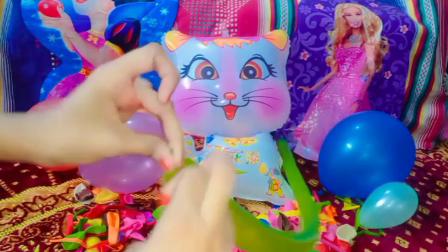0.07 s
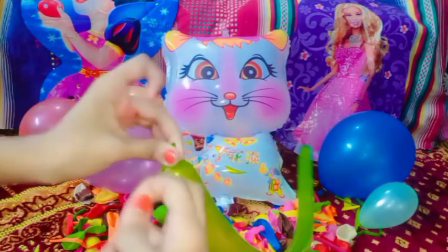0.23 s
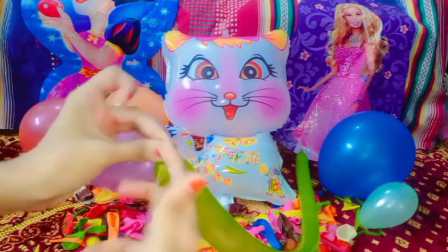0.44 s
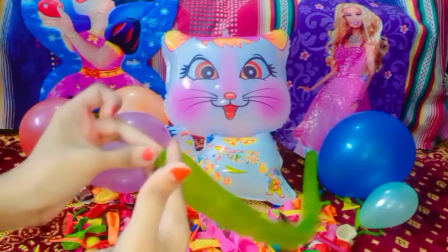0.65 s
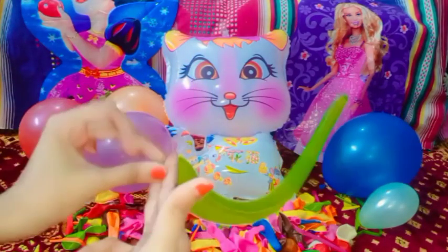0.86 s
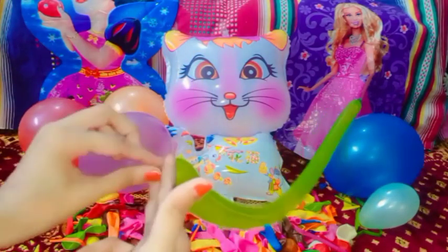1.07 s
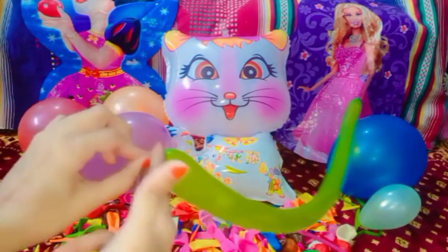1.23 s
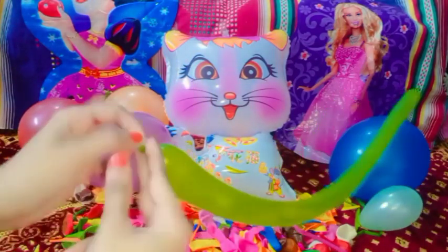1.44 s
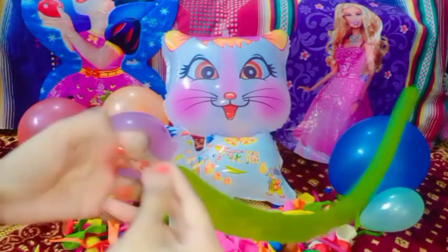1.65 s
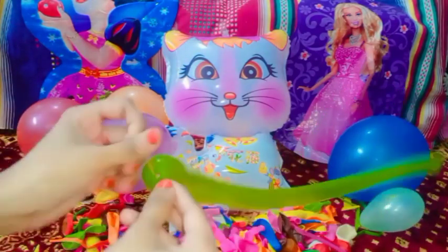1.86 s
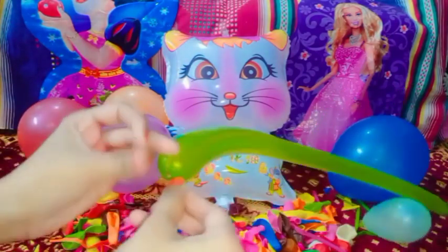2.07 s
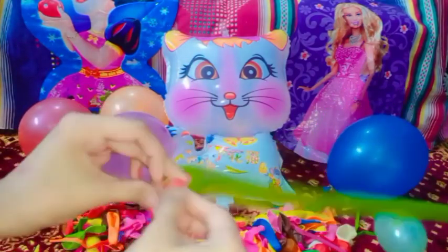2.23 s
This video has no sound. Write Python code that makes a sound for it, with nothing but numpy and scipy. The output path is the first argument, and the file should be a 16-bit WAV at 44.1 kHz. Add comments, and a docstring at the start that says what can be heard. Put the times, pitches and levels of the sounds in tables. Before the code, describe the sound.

Balloon rubber snaps sharply off fingertips, with small ticks and a creak as it is knotted.

```python
"""The rubber neck of a long balloon snaps off the fingertips as it is stretched and knotted.
Each snap is a sharp crack that sets the air inside ringing faintly; the recoiling tube thumps.
The rubber slips over the fingers in small ticks, sings thin notes and creaks as the knot tightens.
Fingers rub the balloon's skin between snaps. It is all close by, over the low hum of a quiet room."""
import sys
import numpy as np
from scipy import signal
from scipy.fft import rfft, irfft, next_fast_len
from scipy.io import wavfile
from scipy.ndimage import map_coordinates

SR = 44100
rng = np.random.default_rng(int(sys.argv[2]) if len(sys.argv) > 2 else 0)


def unload_wav(signal):
    """Save mono or channel-first audio to the path in sys.argv[1] as 16-bit WAV at rate SR, clipped to [-1, 1]."""
    wavfile.write(
        sys.argv[1],
        SR,
        np.round(np.clip(np.atleast_2d(signal).T, -1, 1) * 32767).astype(np.int16),
    )


N = 101429

# A "colour" says how strong low and high sounds are. "fade" is the time to die away by 60 dB.
BACKGROUND_COLOUR = [(15, -27), (25, -2), (75, -7), (108, -7.5), (214, -2.5), (244, -9.5), (278, -8),
                     (411, -11.5), (481, -15.5), (520, -13.5), (578, -15), (694, -11), (1030, -22),
                     (1230, -17.5), (1650, -22.5), (2080, -26.5), (13000, -74.5)]  # the room's steady noise: f/Hz, level/dB
HUM_BANDS = [(113, 29, -50), (241.7, 16, -54.5), (676.4, 56, -58.5)]  # the room's hum: f/Hz, width/Hz, level/dB
RUB_LEVELS = [(0, -70.5), (.17, -71.5), (.26, -52), (.47, -59.5), (.55, -70.5), (.73, -67), (.78, -58),
              (.84, -66), (.96, -61), (1.04, -68.5), (1.11, -60), (1.2, -67), (1.36, -71), (1.44, -66.5),
              (1.58, -69), (1.7, -66.5), (1.79, -64.5), (1.85, -51.5), (1.93, -63), (2, -68.5), (2.06, -55),
              (2.12, -60.5), (2.2, -69.5), (2.3, -61)]  # fingers rubbing: t/s, level/dB
RUB_TONE = [(300, -17.5), (1500, 6.5), (5000, 6.5), (7500, -3.5), (10500, -6.5), (12800, -4.5)]  # colour of the rubbing: f/Hz, level/dB
RUMBLE_LEVELS = [(0, -56), (.22, -46.5), (.3, -43.5), (.46, -42.5), (.53, -63), (1.02, -69), (1.09, -48),
                 (1.2, -53), (1.78, -76), (1.85, -38), (1.98, -47), (2.12, -43.5), (2.3, -49)]  # rumble of handling the balloon: t/s, level/dB
RUMBLE_COLOUR = [(25, -24), (55, -11.5), (115, 5), (230, -7.5), (500, -9.5), (1500, -40), (5000, -101)]  # colour of that rumble: f/Hz, level/dB
RUBBER_COLOUR = [(900, 2), (1130, 3), (1750, 0.5), (4000, -2), (5700, 0.5), (6800, 3.5), (8600, -2.5),
                 (10200, 0)]  # colour of the tight rubber: f/Hz, level/dB
FINGER_SLIPS = [(0.196, -25, 4370, -19), (0.2052, -22, 4360, -19), (0.216, -25, 4070, -37),
                (0.2377, -4, 6540, 13), (.381, -19, 2700, -31), (0.401, -18, 3000, -25),
                (0.449, -16.5, 3500, -38), (0.458, -14.5, 3180, -36), (0.465, -16, 2100, -20),
                (0.763, -21, 1450, -15), (1.536, -38, 4410, -17), (1.621, -34, 3500, -8),
                (1.739, -30, 2940, -16), (1.803, -15.5, 1900, -24), (1.833, -12.5, 1840, -22),
                (1.845, -16, 2300, -14), (1.895, -13.5, 1740, -35), (1.9068, -14.5, 1880, -23),
                (1.9245, -16.5, 1960, -32), (1.956, -19, 2260, -27), (2.104, -22, 1210, -26)]  # small slips of the rubber: t/s, level/dB, f/Hz, treble/dB
# Snaps of the neck: t/s, relative level/dB, f/Hz, width/octaves, bass/dB, treble/dB, fade/s
NECK_SNAPS = [(0.2412, 3.5, 2260, 1, 5, -5.5, 0.011), (0.3647, -12, 3250, 0.95, -2.5, -21, 0.018),
              (1.0825, -21, 2950, 1, -26, -2, 0.0067), (1.8203, -11, 1820, 0.32, -2, -22.5, 0.028),
              (2.0258, -11.5, 1340, 0.78, 11.5, -24, 0.026)]
AIR_NOTES = [(312, -60, .45), (368, -38.5, 0.34), (468.6, -32, 0.18), (913, -42, 0.26), (999, -47.5, 0.71),
             (1760, -47, 0.27), (2800, -53, 0.197)]  # ringing of the air inside: f/Hz, level/dB relative to the snap, fade/s
TUBE_THUMPS = [(.247, -27, 319.7, 0.22), (.251, -20.5, 224.6, 0.14), (1.823, -16.5, 387.3, 0.047),
               (1.828, -19, 227.6, 0.16), (2.02, -18, 601, 0.066), (2.026, -31, 388.5, 0.19),
               (2.04, -35.5, 650, 0.21)]  # low notes of the recoiling tube: t/s, level/dB, f/Hz, fade/s
THIN_NOTES = [(.306, -28.5, 1298, 0.021, 0.12), (.381, -38.5, 1293, .017, 0.24),
              (1.917, -47, 3350, .01, 0.081), (2.17, -68.5, 3385, 0.1, 1.5)]  # notes of the stretched neck: peak t/s, level/dB, f/Hz, rise/s, fade/s
CREAK_LEVELS = [(1.72, -71), (1.8, -51), (1.835, -44.5), (1.878, -51), (1.91, -45), (1.99, -65),
                (2.04, -90)]  # the knot tightening: t/s, level/dB
CREAK_TONE = [(200, -27), (1100, 0.5), (2000, -1.5), (6000, -12), (13000, -39)]  # colour of the creak: f/Hz, level/dB
ECHO_FADES = [(150, 0.37), (600, 0.47), (2000, 0.47), (5000, 0.37), (12000, 0.27)]  # how long the room echoes: f/Hz, fade/s
ECHO_COLOUR = [(100, -15), (300, -14), (700, -4.5), (1800, -2.5), (5000, -7), (12000, -2.5)]  # colour of the room's echo: f/Hz, level/dB

BASS_EDGE_HZ = 604  # the bass of slips and snaps falls off above this


def amp(db):
    """Turn decibels into a number to multiply by."""
    return 10 ** (np.asarray(db) / 20)


def unit(x):
    """Scale a sound to an average strength (rms) of 1."""
    return x / np.sqrt(np.mean(x ** 2) + 1e-20)


def along(points, hz):
    """Read between the (f/Hz, value) rows of a table, on a pitch scale."""
    f, v = np.transpose(points)
    return np.interp(np.log(hz + 1), np.log(f + 1), v)


def loudness(rows):
    """Join (t/s, level/dB) rows into one gain per sample."""
    return amp(np.interp(np.arange(N) / SR, *np.transpose(rows)))


def filtered(x, response):
    """Turn each frequency of x up or down by response(hz)."""
    n = x.shape[-1]
    m = next_fast_len(n + SR // 4)
    return irfft(rfft(x, m) * response(np.fft.rfftfreq(m, 1 / SR)), m)[..., :n]


def noise(colour):
    """Noise of strength 1 with the given colour."""
    return unit(filtered(rng.standard_normal(N), lambda hz: amp(along(colour, hz))))


def wobble(per_s):
    """A smooth curve through per_s random values a second."""
    return map_coordinates(rng.standard_normal(int(N * per_s / SR) + 2), [np.arange(N) * per_s / SR])


def pulse(gain):
    """The most sudden click (minimum phase) that has this gain at each frequency."""
    cepstrum = irfft(np.log(gain + 1e-6))
    half = len(cepstrum) // 2
    cepstrum[1:half] *= 2
    cepstrum[half + 1:] = 0
    return irfft(np.exp(rfft(cepstrum)))


def room_tone():
    """The room's steady dull noise, with a few narrow bands that hum."""
    out = amp(-47) * noise(BACKGROUND_COLOUR)
    for centre_hz, width, db in HUM_BANDS:
        hum = filtered(rng.standard_normal(N), lambda hz: 1 / (1 + (2 * (hz - centre_hz) / width) ** 2))
        out += amp(db) * unit(hum)
    return out


def fingers():
    """Fingers rub the balloon with a grainy hiss, and handling it makes a dull rumble."""
    grain = amp(2 * wobble(per_s=250))
    rub = unit(noise(RUB_TONE) * grain)
    return rub * loudness(RUB_LEVELS) + noise(RUMBLE_COLOUR) * loudness(RUMBLE_LEVELS)


def rubber_band(hz, centre_hz, width_oct, treble_db, peak_top_hz=5140):
    """Gain at each frequency for a patch of rubber let go: one broad peak plus some treble."""
    peak = np.exp(-.5 * (np.log2(hz / centre_hz) / width_oct) ** 2)
    peak /= np.sqrt(1 + (hz / peak_top_hz) ** 20)
    treble = amp(treble_db) * hz ** 2 / (hz ** 2 + centre_hz ** 2) / np.sqrt(1 + (hz / 11000) ** 2)
    return (peak + treble) * amp(along(RUBBER_COLOUR, hz))


def slips(size=2048, rise_s=.0025, fade_s=.016):
    """The rubber creeps over the fingers in short, soft-edged scrapes."""
    out, hz, t = np.zeros(N), np.fft.rfftfreq(size, 1 / SR) + 1, np.arange(size) / SR
    bass = amp(-5) / (1 + (hz / BASS_EDGE_HZ) ** 2)
    for s, db, centre_hz, treble_db in FINGER_SLIPS:
        friction = rng.standard_normal(size) * amp(-60 * t / fade_s) * (1 - np.exp(-t / rise_s)) ** 2
        band = rubber_band(hz, centre_hz, width_oct=1, treble_db=treble_db)
        scrape = signal.fftconvolve(friction, pulse(band + bass))[:size]
        add(out, s, amp(db) * in_room(scrape / np.linalg.norm(scrape)))
    return out


def add(track, s, sound):
    """Mix a sound into the track, starting at s seconds."""
    part = track[round(s * SR):][:len(sound)]
    part += sound[:len(part)]


def in_room(sound, wall_s=.0148, early_s=.022):
    """The room answers a sound: scatter from nearby, an echo off the first wall, then a fading tail."""
    hz, t, spectrum = signal.stft(rng.standard_normal(SR * 2 // 3), SR, nperseg=256)
    fading = amp(-60 * t / along(ECHO_FADES, hz)[:, None])
    tail = signal.istft(spectrum * fading, SR, nperseg=256)[1]
    since_wall = np.arange(len(tail)) / SR - wall_s
    early_echoes = amp(.5) * np.exp(-np.abs(since_wall) / early_s)
    tail *= np.where(since_wall < 0, amp(.5), 1 + early_echoes)
    answer = amp(-3.5) * filtered(tail / np.linalg.norm(tail), lambda f: amp(along(ECHO_COLOUR, f)))
    answer[0] += 1  # the direct sound
    answer[round(wall_s * SR)] += amp(-20)  # the first wall
    return signal.fftconvolve(sound, answer)


def crack(centre_hz, width_oct, bass_db, treble_db, fade_s, size=2048):
    """Rubber let go: one sharp click with a low push, then a brief, duller flutter of the skin."""
    hz, t = np.fft.rfftfreq(size, 1 / SR) + 1, np.arange(size) / SR
    band = rubber_band(hz, centre_hz, width_oct, treble_db)
    bass = amp(bass_db) / (1 + (hz / BASS_EDGE_HZ) ** 2) * hz ** 2 / (hz ** 2 + 170 ** 2)
    click = pulse(band + 2 * bass)
    flapping = rng.standard_normal(size) * amp(-60 * t / fade_s) * (1 - np.exp(-t / .00095))
    flapping *= amp(5) / np.linalg.norm(flapping)
    flutter = signal.fftconvolve(flapping, pulse(band / np.hypot(1, hz / 8000)))[:size]
    out = flutter - click
    return out / np.linalg.norm(out)


def air_ring(rise_s=.0012, spread_db=2.04):
    """The air in the balloon rings with several fading notes, in a slightly new mix each time."""
    air, t = 0, np.arange(SR * 2 // 3) / SR
    for hz, db, fade_s in AIR_NOTES:
        strength = amp(db + rng.normal(0, spread_db) - 60 * t / fade_s)
        air += strength * np.sin(2 * np.pi * (hz * t + rng.random()))
    return air * (1 - np.exp(-t / rise_s))


def snaps(crack_boost_db=7):
    """The neck snaps off a fingertip: it cracks and sets the air inside ringing."""
    out = np.zeros(N)
    for s, db, centre_hz, width_oct, bass_db, treble_db, fade_s in NECK_SNAPS:
        snap = crack(centre_hz, width_oct, bass_db, treble_db, fade_s)
        add(out, s, amp(db + crack_boost_db) * in_room(snap))
        add(out, s, amp(db) * air_ring())
    return out


def thumps(rise_s=.012):
    """Soft low notes swell and die as the tube springs back."""
    out, t = np.zeros(N), np.arange(SR // 2) / SR
    swell = 1 - np.exp(-(t / rise_s) ** 2)
    for s, db, hz, fade_s in TUBE_THUMPS:
        add(out, s, swell * amp(db - 60 * t / fade_s) * np.sin(2 * np.pi * hz * t))
    return out


def neck_notes(rough_db=2, waver_rad=.3, wobbles_per_s=130):
    """The tight neck sings briefly: each note swells and dies, rough in level and pitch."""
    out = np.zeros(N)
    for s, db, hz, rise_s, fade_s in THIN_NOTES:
        t = np.arange(N) / SR - s
        envelope = np.exp(np.minimum(t, 0) / rise_s) * amp(db - 60 * np.maximum(t, 0) / fade_s)
        roughness = amp(rough_db * wobble(wobbles_per_s))
        waver = waver_rad * wobble(wobbles_per_s)
        out += envelope * roughness * np.sin(2 * np.pi * hz * t + waver)
    return out


def creak(slips_per_s=1100):
    """A crowd of tiny slips blurs into a dull creak as the knot is pulled tight."""
    ticks = (rng.random(N) < slips_per_s / SR) * rng.standard_normal(N)
    return unit(filtered(ticks, lambda hz: amp(along(CREAK_TONE, hz)))) * loudness(CREAK_LEVELS)


def scene(spread_above_hz=4100):
    """Everything sits in the centre, with the treble spread a little to left and right."""
    centre = room_tone() + fingers() + slips() + snaps() + thumps() + neck_notes() + creak()
    scatter = rng.standard_normal(SR // 400 * 2 + 1)
    scatter = scatter - scatter[::-1]  # keeps left and right equally loud
    side = signal.fftconvolve(centre, scatter / np.linalg.norm(scatter), mode="same")
    side = filtered(side, lambda hz: amp(-59) + amp(-13) / (1 + (spread_above_hz / (hz + 1)) ** 20))
    return np.array([centre + side, centre - side])


def record(dry, bottom_hz=38, ceiling=.8, top_hz=13130):
    """Cut the deepest bass, round off the tallest peaks and cut the highest treble."""
    low_cut = filtered(dry, lambda hz: 1 / np.sqrt(1 + (bottom_hz / (hz + 1)) ** 10))
    rounded = low_cut / (1 + np.abs(low_cut / ceiling) ** 4) ** .25
    return filtered(rounded, lambda hz: 1 / np.sqrt(1 + (hz / top_hz) ** 180))


dry = scene()
out = record(dry)
unload_wav(out)
```